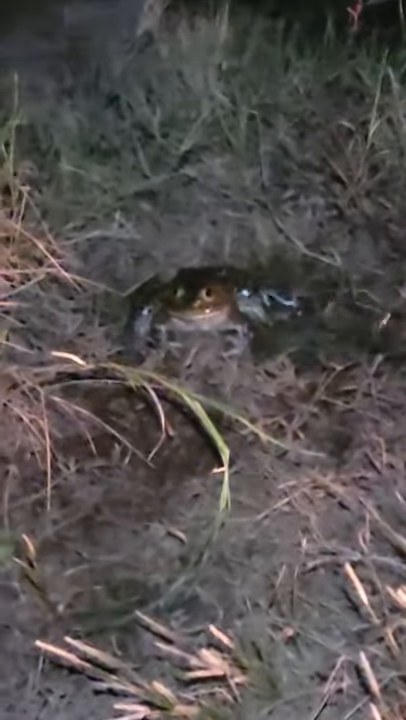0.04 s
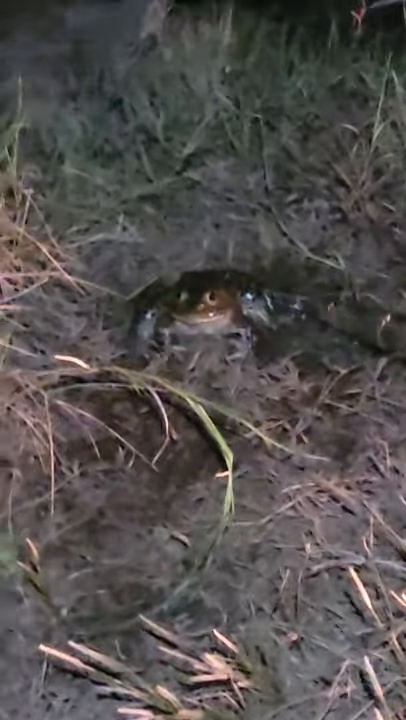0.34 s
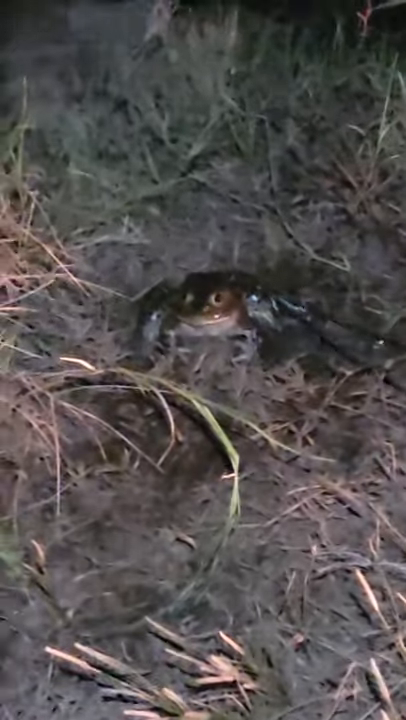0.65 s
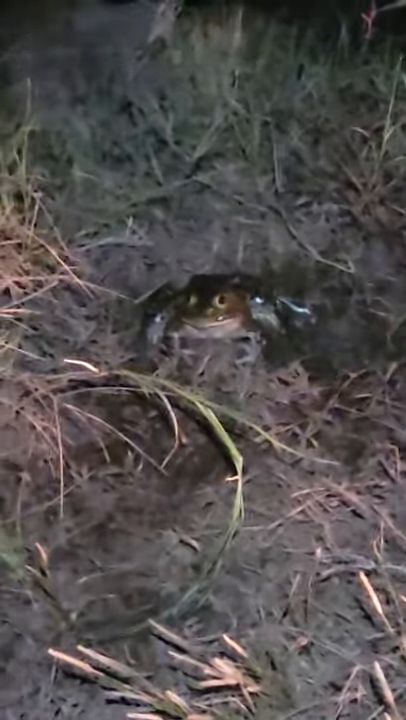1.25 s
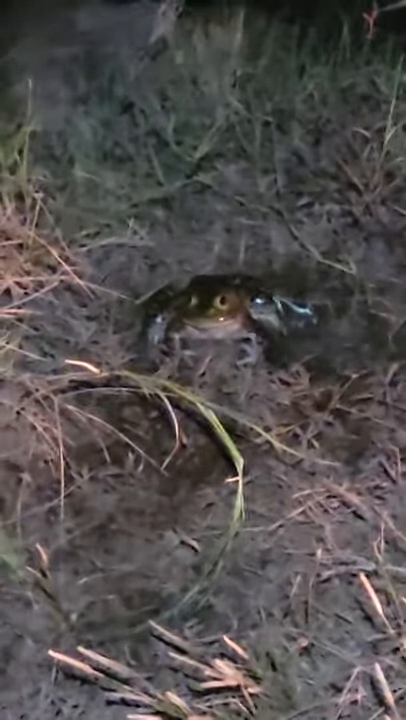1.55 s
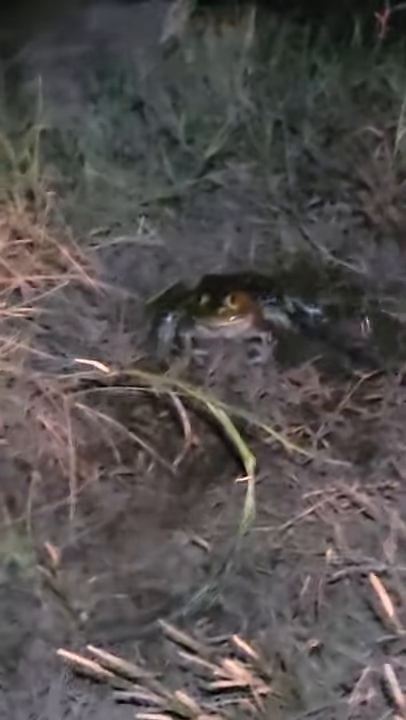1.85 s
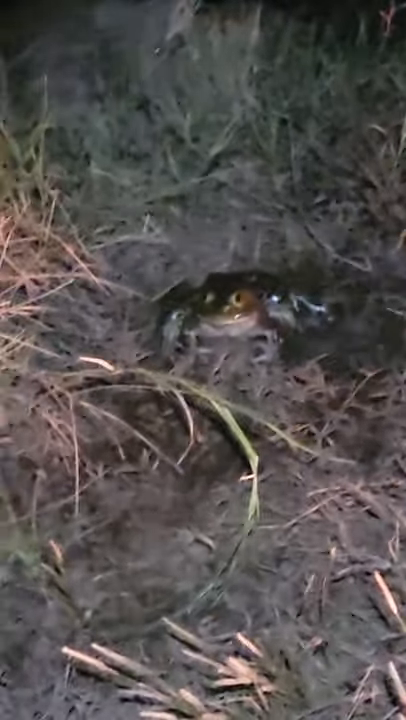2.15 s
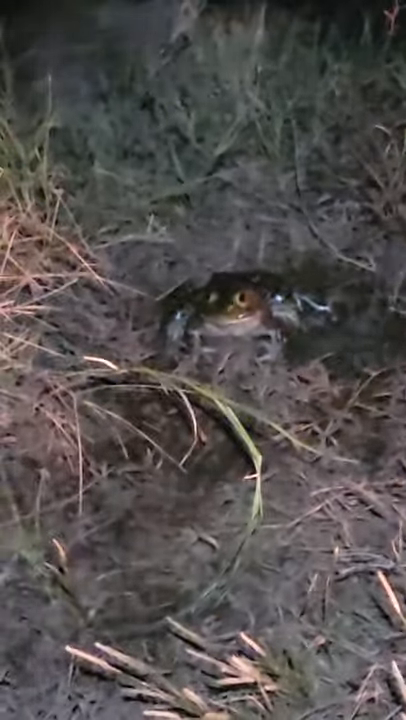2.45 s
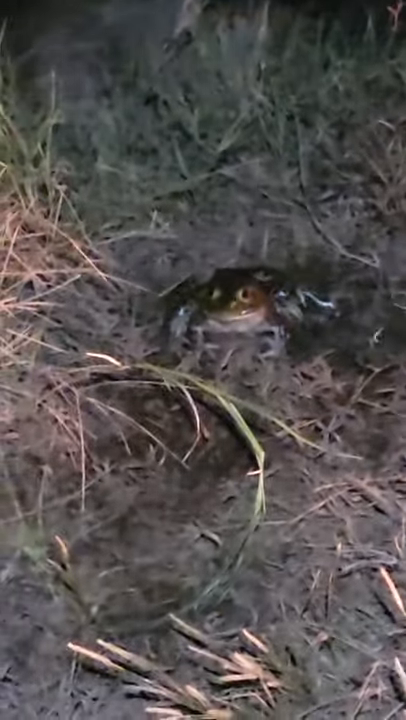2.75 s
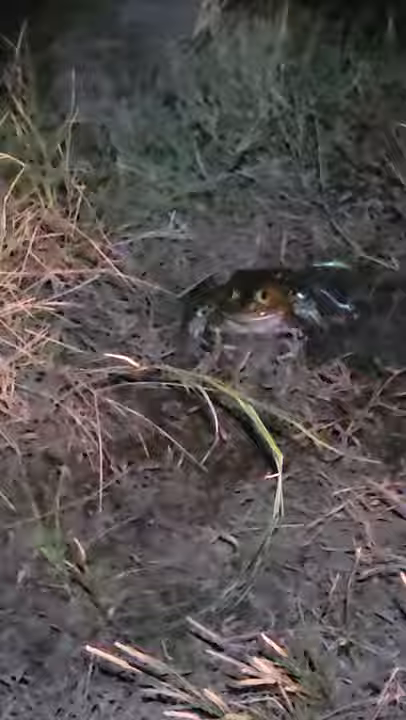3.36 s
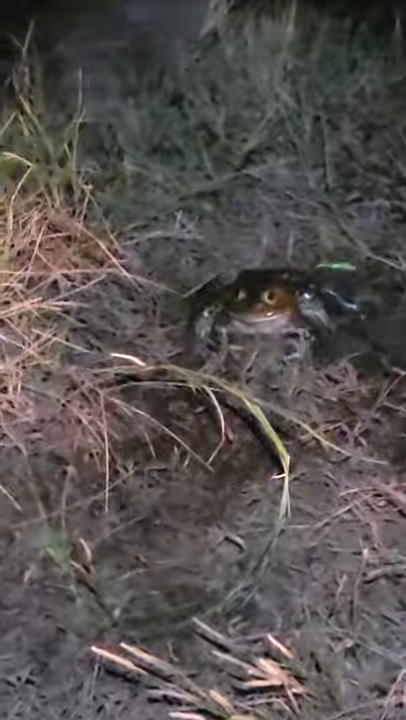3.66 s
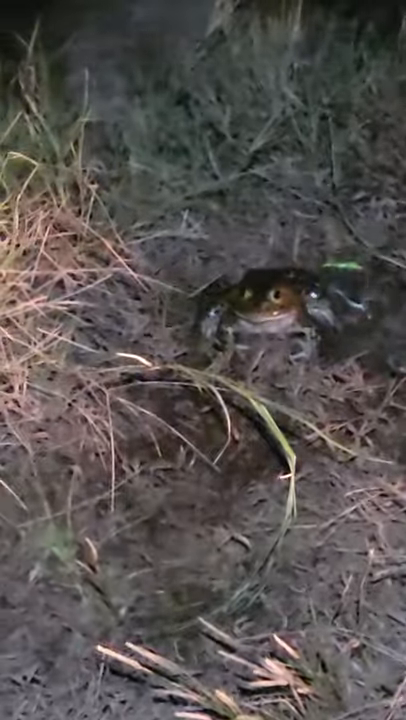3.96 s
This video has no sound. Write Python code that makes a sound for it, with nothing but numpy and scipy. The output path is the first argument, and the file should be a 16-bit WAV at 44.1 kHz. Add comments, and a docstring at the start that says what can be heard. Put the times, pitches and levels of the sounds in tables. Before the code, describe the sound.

Crickets trill and chirp at night over a distant machine's low hum.

```python
"""A muddy pond at night. A distant machine, perhaps a pump or fan, hums under the hiss of the air.
Crickets sing by rubbing their wings: a far chorus trills near 7 kHz, and one close by chirps near
4.4 kHz in double pulses, each pair led in by a faint stroke. Katydids rasp their wings high on the right.
Late on come one sharp tick and a few faint crackles of stems in the dry grass."""
import sys
import numpy as np
from scipy import signal
from scipy.fft import rfft, irfft
from scipy.io import wavfile

SR = 44100
rng = np.random.default_rng(int(sys.argv[2]) if len(sys.argv) > 2 else 0)


def master(y):
    """Save y as 16-bit WAV."""
    cut = np.clip(np.atleast_2d(y).T, -1, 1)
    pcm = np.round(cut * 32767)  # scale
    wavfile.write(sys.argv[1], SR, pcm.astype(np.int16))


N = 176400
TIME, FREQS = np.arange(N) / SR, np.arange(N // 2 + 1) * SR / N

# where each band of the far hiss sits, positive to the left: freq_hz, pan_db
HISS_PAN = [(300, -12), (600, -2), (1350, -7), (1750, -3), (2000, 0.5), (2800, 2), (3900, 2.5),
            (4900, -7.5), (5800, 6), (8500, 5.5), (10000, 5), (11500, -11), (15500, 3)]


def from_db(db):
    """Decibels to gain."""
    return 10 ** (np.asarray(db) / 20)


def rms_one(x):
    """Scale to unit rms."""
    return x / np.sqrt(np.mean(x ** 2) + 1e-20)


def spectrum(points):
    """Draw a curve through breakpoints along log frequency."""
    hz, value = np.transpose(points)
    return np.interp(np.log(FREQS + 1e-9), np.log(hz), value)


def pan(db):
    """Constant-power left and right gains; positive dB leans left."""
    ratio = from_db(np.atleast_1d(db))
    return np.array([ratio, np.ones_like(ratio)]) * np.sqrt(2 / (1 + ratio ** 2))


def drift(hz):
    """A random modulator of unit rms that rolls off above hz."""
    return rms_one(irfft(rfft(rng.standard_normal(N)) / (1 + (FREQS / hz) ** 2), N))


def noise(colour, pan_db=0, ripple_db=0):
    """Coloured stereo noise, nearly mono in the bass and wide in the treble."""
    # how alike the two ears are: freq_hz, correlation
    ear_likeness = [(300, 0.94), (550, 0.91), (800, 0.68), (1300, 0.59), (1750, 0.37), (2000, -0.22),
                    (3600, -0.21), (4800, -0.62), (6000, 0.028), (8600, -0.076), (10200, -0.18),
                    (14000, 0.25)]
    mid, side = rfft(rng.standard_normal((2, N)))
    alike = spectrum(ear_likeness)
    ears = np.sqrt(1 + alike) * mid + np.sqrt(1 - alike) * side * [[1], [-1]]
    return irfft(ears * from_db(spectrum(colour) + ripple_db) * pan(pan_db), N) * np.sqrt(SR) / 2


def scatter(x, t60_s):
    """Dense echoes from grass and trees, different in each ear, as strong as the source."""
    tail = rng.standard_normal((2, SR // 2)) * from_db(-60 * TIME[:SR // 2] / t60_s)
    return rms_one(signal.fftconvolve(x[None], tail, axes=1)[:, :N]) * np.std(x)


def night_air():
    """A bed of far hiss, with narrow peaks and dips across its spectrum."""
    # colour of the hiss: freq_hz, density_db
    hiss_colour = [(500, -100), (800, -77), (1000, -73.5), (1350, -71.5), (1750, -77), (1950, -81.5),
                   (2300, -82), (2650, -85.5), (3200, -87), (3850, -91.5), (4350, -87.5), (5000, -92.5),
                   (5800, -91.5), (7800, -96), (8600, -93), (9300, -105.5), (10000, -99.5), (10800, -106.5),
                   (13500, -94.5), (15800, -104)]
    ripple_db, ripple_step_hz = 1.72, 9
    ripple = np.interp(FREQS / ripple_step_hz, np.arange(len(FREQS)), rng.standard_normal(len(FREQS)))
    return noise(hiss_colour, spectrum(HISS_PAN), ripple_db * ripple)


def hiss_peaks():
    """Brief faint pitched swells in the hiss, panned like the hiss at their pitch."""
    # swells in the hiss: centre_s, level_db, pitch_hz
    swells = [(2.605, -48, 1774), (3.02, -44, 1355), (3.255, -51, 1745)]
    out, width_s = 0, 0.011
    for centre_s, db, hz in swells:
        swell = np.exp(-.5 * ((TIME - centre_s) / width_s) ** 2)
        pan_db = np.interp(hz, *np.transpose(HISS_PAN))
        out += np.sqrt(2) * from_db(db) * pan(pan_db) * swell * np.sin(2 * np.pi * hz * TIME)
    return out


def machine():
    """A distant hum whose tones waver on their way through the air, over a low rush."""
    # low rush of the machine and the air: freq_hz, density_db
    rush_colour = [(15, -80), (30, -75), (50, -63), (80, -55), (105, -60.5), (130, -63.5), (175, -61.5),
                   (245, -71), (320, -70), (420, -74.5), (530, -73.5), (590, -79.5), (800, -75),
                   (1000, -103.5)]
    # tones of the hum: pitch_hz, level_db, unsteadiness (0-1), pan_db
    hum_tones = [(101.1, -31, 0.12, -0.1), (165.4, -49, 0.85, 0), (201.7, -46.5, 0.46, 2),
                 (224.5, -49.5, 0.24, -1), (328.1, -44, 0.1, 0), (453.2, -61.5, 0.4, 0),
                 (495.7, -59, 0.7, -10), (653, -58, 0.58, -12), (818.4, -53.5, 0.76, -10),
                 (978, -53, 0.76, -1), (1322, -58, 0.9, -4)]
    out, waver_hz = noise(rush_colour), 5.4
    for hz, db, unsteady, pan_db in hum_tones:
        waver = (drift(waver_hz) + 1j * drift(waver_hz)) / np.sqrt(2)  # moves both level and phase
        carrier = np.exp(2j * np.pi * (hz * TIME + rng.random()))
        tone = np.real((np.sqrt(1 - unsteady ** 2) + unsteady * waver) * carrier)
        out += from_db(db) * rms_one(tone) * pan(pan_db)
    return out


def far_insects():
    """Countless far crickets merge into a high sheen, above a lower band that throbs unevenly."""
    # colour of the sheen: freq_hz, density_db
    sheen_colour = [(5600, -104), (6050, -87), (6400, -80.5), (6850, -79.5), (7050, -82.5), (7250, -90),
                    (7400, -91), (7650, -103)]
    # level ride of the lower band: time_s, level_db
    low_ride = [(0, -51), (.6, -56), (.85, -53.5), (1.12, -52), (1.25, -54.5), (1.6, -54), (1.8, -53),
                (2.0, -59), (2.7, -55.5), (3.2, -55), (4, -52.5)]
    # colour of the lower band: freq_hz, gain_db
    low_colour = [(2300, -16), (2520, -4), (2590, 4), (2680, -4.5), (2850, -2), (3200, -11), (3500, -52)]
    throb_db = 1.5 * drift(hz=8.1)
    low_gain = from_db(np.interp(TIME, *np.transpose(low_ride)) + throb_db)
    return noise(sheen_colour, pan_db=5) + low_gain * rms_one(noise(low_colour, pan_db=3))


def cricket_chorus():
    """Far crickets trill in fast pulses that fall in pitch, blurred by echoes and slowly swelling."""
    # one row a cricket: pitch_hz, pulse_rate_hz, level_db (at mid-scene), pan_db
    trillers = [(6890, 43, -53.5, 5.5), (6745, 45, -53, 10), (6390, 40.6, -59, -1), (6660, 55, -62, 18)]
    fall_hz, jitter_hz, rate_wander, duty = 327.8, 44.87, 0.01196, .65
    out, wet, swell_db_per_s = 0, 0.64, 0.66
    for hz, rate_hz, db, pan_db in trillers:
        pulse_hz = rate_hz * (1 + rate_wander * drift(hz=2.02))
        cycle = (np.cumsum(pulse_hz) / SR + rng.random()) % 1
        stroke = np.minimum(cycle / duty, 1)  # 0 to 1, then a rest
        pitch = hz + fall_hz * (.5 - stroke) + jitter_hz * drift(hz=88.9)
        song = rms_one(np.sin(np.pi * stroke) * np.sin(2 * np.pi * np.cumsum(pitch) / SR))
        direct = np.array([song, np.roll(song, 2)])  # right ear two samples late
        echoes = scatter(song, t60_s=0.087)
        out += from_db(db) * pan(pan_db) * (np.sqrt(1 - wet) * direct + np.sqrt(wet) * echoes)
    return out * from_db(swell_db_per_s * (TIME - TIME.mean()))


def dry_grass():
    """Dry stems rub softly and snap; each snap is a broad crack with a short resonance."""
    # colour of rubbing stems: freq_hz, gain_db
    rub_colour = [(2000, -11), (3400, -2), (4600, 5), (6500, -2), (8000, -8), (9500, -8), (10800, 1),
                  (13500, -2), (16000, -16)]
    # soft rustles: centre_s, level_db, width_s
    rustles = [(2.972, -45, 0.018), (3.200, -47, 0.029), (3.872, -44, 0.017)]
    # snapping stems: start_s, level_db, ring_hz, decay_s
    snaps = [(2.9715, -43, 4570, .004), (3.187, -40, 4600, .003), (3.8445, -33.5, 3600, .0022),
             (3.856, -34.5, 3900, .0022), (3.8645, -32.5, 11000, 0.0013), (3.87, -38, 11600, 0.0014),
             (3.8750, -30, 4540, 0.0017)]
    ring_sharpness, attack_s, crack_db = 4.7, .0004, -14
    rub = rms_one(noise(rub_colour))
    white = rfft(rng.standard_normal((2, N)))
    out = rub * sum(from_db(db) * np.exp(-np.abs(TIME - s) / width_s) for s, db, width_s in rustles)
    for start_s, db, hz, decay_s in snaps:
        age = np.maximum(TIME - start_s, 0)
        envelope = (1 - np.exp(-age / attack_s)) * np.exp(-age / decay_s)
        ring = rms_one(irfft(white / (1 + (ring_sharpness * (FREQS / hz - 1)) ** 2), N))
        out += from_db(db) * envelope * (ring + from_db(crack_db) * rub)
    return out


def tick():
    """One bright snap on the right that rings for a moment, with a short echo from the ground."""
    # resonant colour of the snap: freq_hz, gain_db
    snap_colour = [(7000, -20), (9900, -18), (10600, -3), (11200, 0), (11800, -8), (13200, -6), (13900, 0),
                   (14600, -5), (16000, -7)]
    start_s, attack_s, snap_db, snap_decay_s = 2.9712, 0.00057, -28.5, .0034
    ring_hz, ring_db, ring_decay_s, echo_db = 11100, -21, 0.0016, -9
    age = np.maximum(TIME - start_s, 0)
    snap = from_db(snap_db) * np.exp(-age / snap_decay_s) * rms_one(noise(snap_colour)[0])
    ring = from_db(ring_db) * np.exp(-age / ring_decay_s) * np.sin(2 * np.pi * ring_hz * age)
    direct = (snap + ring) * (1 - np.exp(-age / attack_s))
    return pan(db=-13) * (direct + from_db(echo_db) * scatter(direct, t60_s=.035))


def katydids():
    """High rasping wing strokes on the right: single lisps from one insect, a shuffle from another."""
    # single lisps: centre_s, level_db
    lisps = [(.811, -57), (.999, -53), (1.269, -56), (1.442, -54), (1.647, -52), (2.167, -55)]
    # colour of a lisp: freq_hz, gain_db
    lisp_colour = [(9500, -28), (10600, -2), (11700, 2), (12800, -4), (14000, -11), (16000, -16)]
    # level ride of the shuffle: time_s, level_db
    shuffle_ride = [(0, -59), (.6, -65), (2.05, -78), (2.3, -60), (2.8, -57), (3.3, -56), (3.52, -53),
                    (4, -56)]
    # colour of the shuffle: freq_hz, gain_db
    shuffle_colour = [(9500, -23), (10600, -1.5), (12300, 3), (13500, -7), (16000, -11.5)]
    lisp_width_s, flutter_db = 0.0076, 1.3
    period_s, on_beat_s, beat_sharpness = .0648, 3.480, 1.4
    lisp_gain = sum(from_db(db) * np.exp(-.5 * ((TIME - s) / lisp_width_s) ** 2) for s, db in lisps)
    beats = np.abs(np.cos(np.pi * (TIME - on_beat_s) / period_s)) ** beat_sharpness
    shuffle_db = np.interp(TIME, *np.transpose(shuffle_ride)) + flutter_db * drift(hz=40)
    lisping = lisp_gain * rms_one(noise(lisp_colour))
    shuffling = beats * from_db(shuffle_db) * rms_one(noise(shuffle_colour))
    return pan(db=-6) * (lisping + shuffling)


def near_cricket():
    """Each wing stroke is a short, rough tone that swells, arches in pitch and sags as the wings slow."""
    # wing strokes: centre_s, level_db, centre_pitch_hz, pan_db, length_s
    strokes = [(0.953, -53.5, 4260, 5, 0.03), (1.025, -41.5, 4420, 4, 0.027),
               (1.108, -39.5, 4440, 3, 0.032), (1.548, -54, 4230, 4, .03), (1.619, -40.5, 4430, 6, 0.025),
               (1.700, -42, 4430, 8, 0.031), (2.635, -55, 4250, 8, .03), (2.709, -43, 4400, 5, .028),
               (2.789, -41.5, 4430, 3, 0.03), (3.642, -51, 4290, 2, .055), (3.708, -46, 4370, 5, 0.036),
               (3.790, -43.5, 4440, 2, 0.042)]
    arch_hz, sag_hz, jitter_hz = 250, 90, 22
    roundness, crescendo, rasp = .6, .15, .13
    right_lag_s, echo_db = .00009, -18.5
    out, jitter = np.zeros((2, N)), jitter_hz * drift(hz=360)
    for centre_s, db, hz, pan_db, length_s in strokes:
        along = np.clip(2 * (TIME - centre_s) / length_s, -1, 1)  # -1 to 1 through the stroke
        pitch = hz - arch_hz * along ** 2 - sag_hz * along ** 3 + jitter
        phase = 2 * np.pi * np.cumsum(pitch) / SR
        tone = np.sin([phase, phase - 2 * np.pi * hz * right_lag_s])
        swell = (1 - along ** 2) ** roundness * (1 + crescendo * along)
        out += np.sqrt(2) * from_db(db) * pan(pan_db) * swell * tone
    out *= 1 + rasp * drift(hz=200)
    return out + from_db(echo_db) * scatter(out[0], t60_s=.25)


def scene():
    """Insects and small noises over a bed of hum and night air."""
    bed = machine() + night_air() + hiss_peaks() + far_insects()
    return bed + cricket_chorus() + near_cricket() + katydids() + tick() + dry_grass()


def record(dry):
    """A steep low-pass takes off the very top."""
    cutoff_hz = 15800
    return signal.sosfilt(signal.ellip(12, .1, 80, cutoff_hz, fs=SR, output="sos"), dry)


dry = scene()
out = record(dry)
master(out)
```